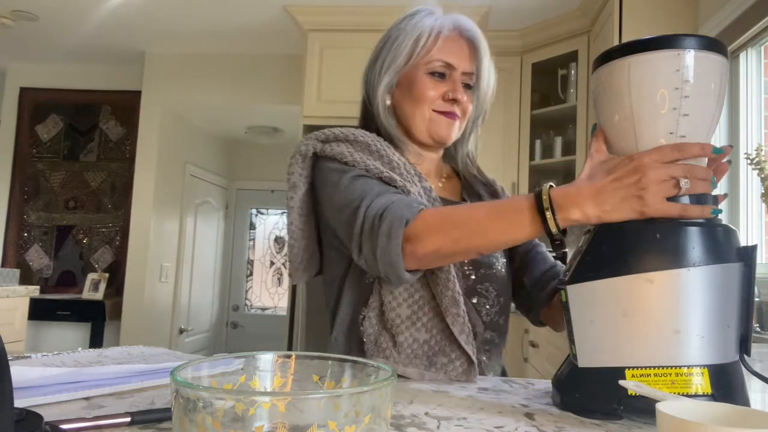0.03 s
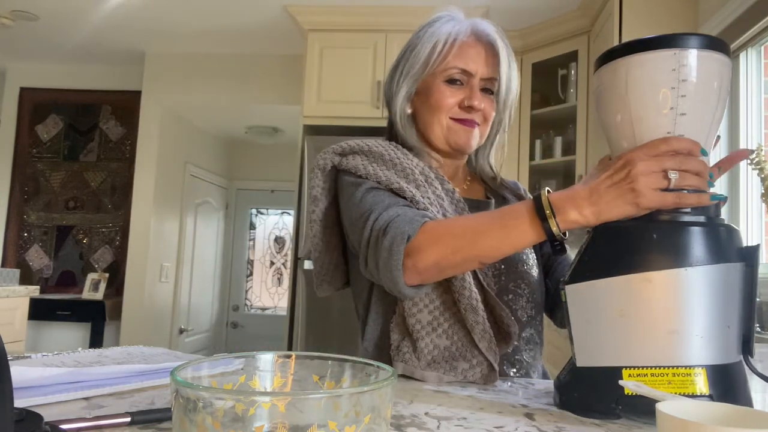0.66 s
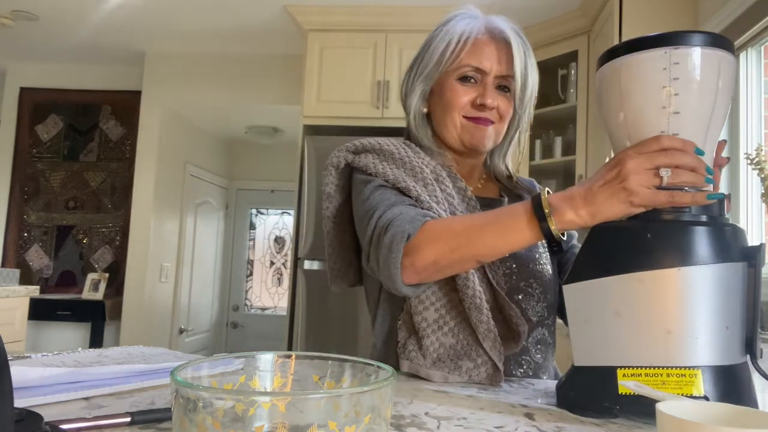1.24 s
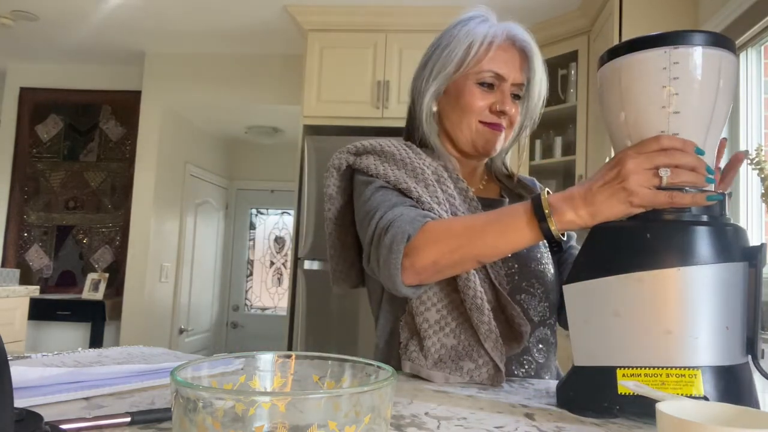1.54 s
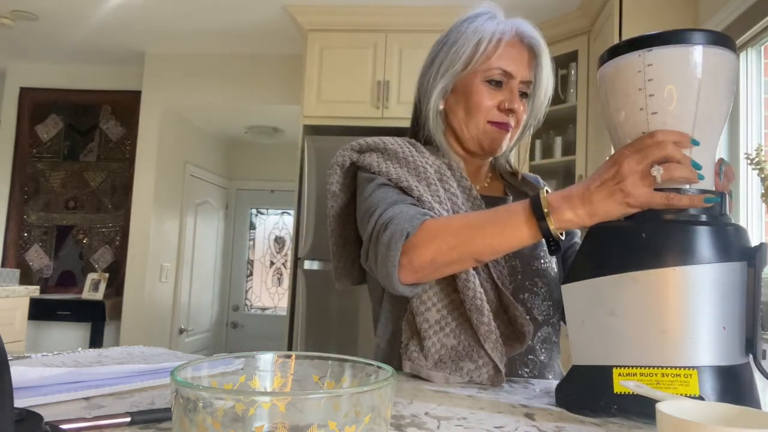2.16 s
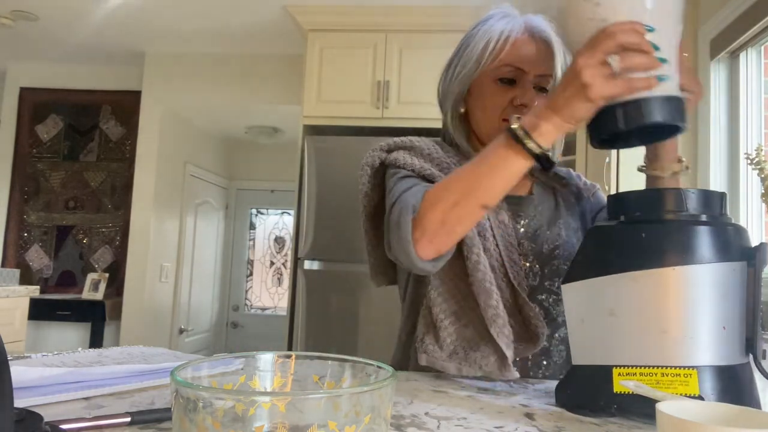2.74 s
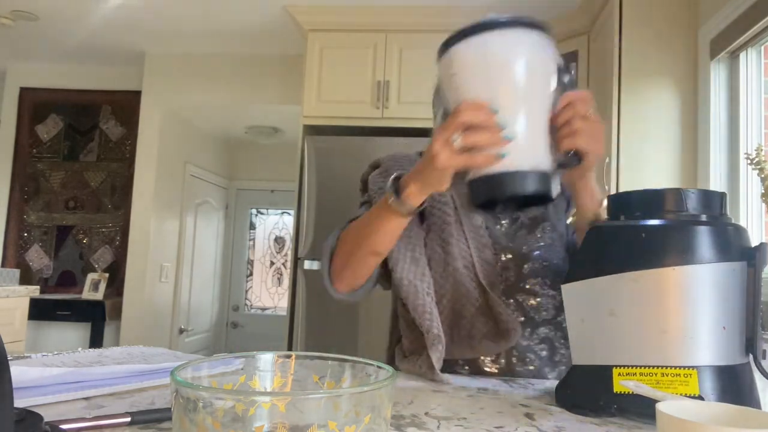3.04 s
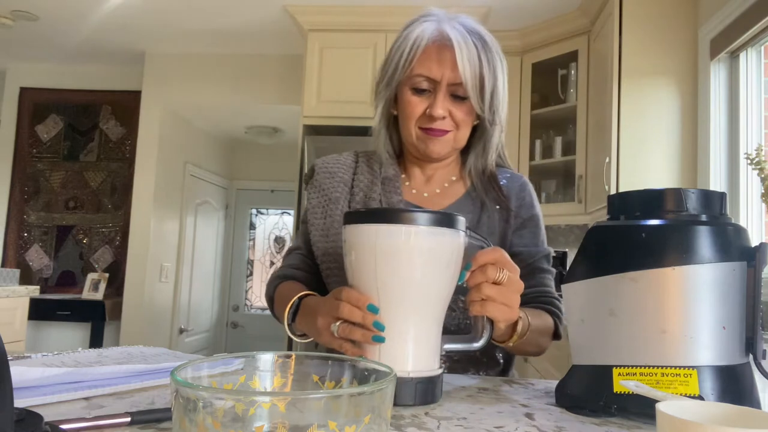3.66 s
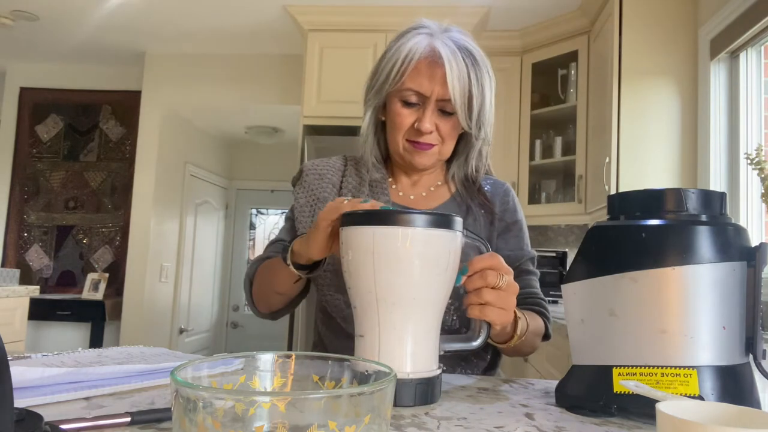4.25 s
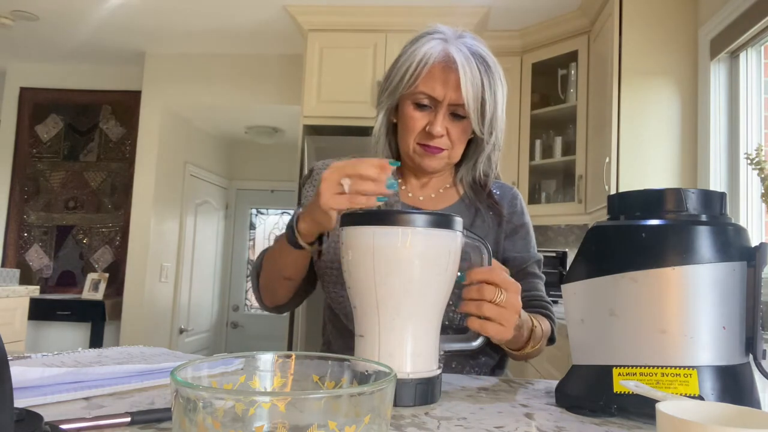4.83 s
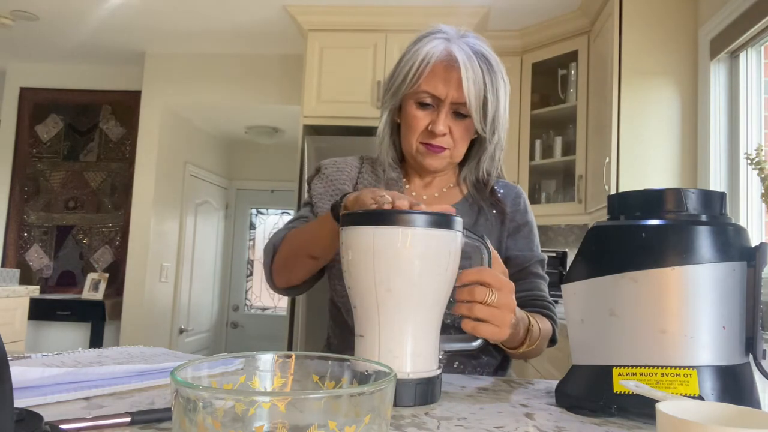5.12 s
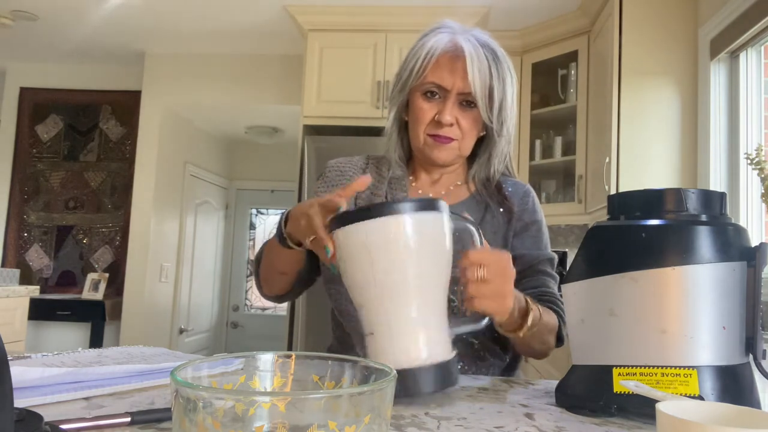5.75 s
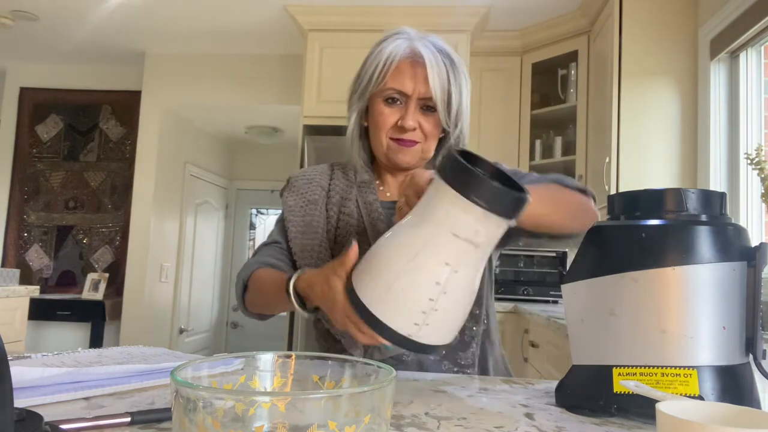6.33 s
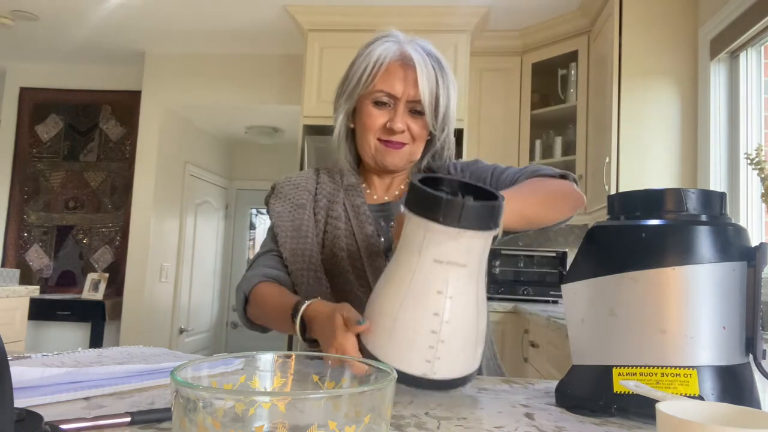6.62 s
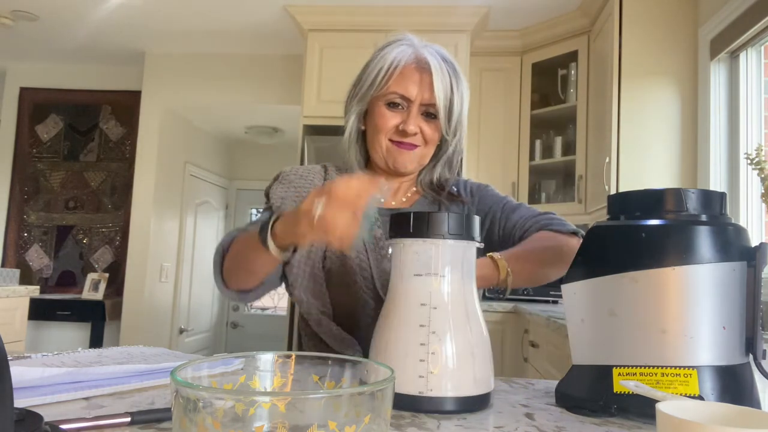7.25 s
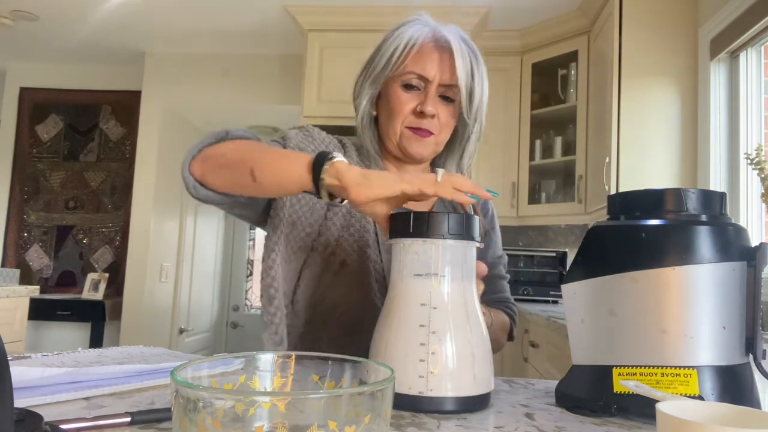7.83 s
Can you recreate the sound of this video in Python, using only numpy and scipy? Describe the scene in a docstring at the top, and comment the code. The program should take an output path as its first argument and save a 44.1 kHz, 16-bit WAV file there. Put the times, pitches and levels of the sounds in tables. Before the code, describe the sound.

Close up in a slightly echoing kitchen, a blender's last brief rattle dies away on the right. Its plastic pitcher ticks and scrapes in the base, then comes loose with a clunk. A little to the left it knocks down on the counter, and hands quietly tap and slide over it. Two louder, booming knocks follow as it lands again, ending with light fingernail clicks over a low room hum.

```python
"""A hard-walled kitchen, two microphones side by side, close to a blender on a stone counter.
On the right the motor rattles to a stop and the full plastic pitcher is twisted free with a clunk.
A little to the left it is set down, turned over and set down again, booming in the cabinet below.
Hands tap and rub on the plastic; the room rings after every knock, over a low steady hum."""
import sys
import numpy as np
from scipy import signal
from scipy.fft import rfft, irfft, next_fast_len
from scipy.io import wavfile

SR = 44100
rng = np.random.default_rng(int(sys.argv[2]) if len(sys.argv) > 2 else 0)


def store_pcm(level_fs):
    """Save levels as 16-bit WAV."""
    pcm = np.round(np.clip(level_fs, -1, 1) * 32767).astype(np.int16)
    wavfile.write(sys.argv[1], SR, np.atleast_2d(pcm).T)


N = 347640

# The pitcher knocking free of the base. Each row: start in seconds, ring in dB, contact cut-off in Hz,
# crack in dB, crack t60 in seconds, left minus right in dB.
UNSEAT_KNOCKS = [(2.0738, -28.5, 1790, -24, .04, 3.5), (2.0795, -35, 1490, -29.5, 0.046, -6.5),
                 (2.0838, -12.5, 520, -27, 0.11, 0), (2.0915, -23.5, 500, -50, 0.088, 3.5),
                 (2.325, -50.5, 500, -58.5, 0.076, 7), (2.418, -40.5, 450, -56, 0.091, 4),
                 (2.429, -35, 700, -56, 0.26, -3), (2.452, -41, 1470, -48.5, 0.17, 4)]
# The loose coupling ticking in its seat. Each row reads as for the knocks above.
SEAT_TICKS = [(.4875, -54, 2960, -56.5, 0.086, 0), (.769, -51.5, 1996, -61, 0.087, 0.0024),
              (.815, -62, 1100, -74, 0.025, 0.0039), (1.8575, -48, 2500, -50.5, 0.038, 0),
              (1.953, -51.5, 1300, -66.5, 0.04, 0.0015)]
# The pitcher on the counter. Each row: the same six, then cabinet boom in dB, cabinet drum in dB.
COUNTER_KNOCKS = [(3.6204, -17.5, 440, -39, 0.027, 2.5, -40.5, -51),
                  (3.672, -23, 447, -43.5, 0.02, 1, -42.5, -39.5),
                  (6.7012, -18.5, 650, -26, 0.02, 0.5, -21.5, -25),
                  (6.7092, -9.5, 200, -42.5, 0.06, 3, -33, -32),
                  (6.7771, -19, 684, -38.5, 0.024, -0.5, -30.5, -25.5),
                  (6.8106, -23.5, 677, -36, 0.013, 2.5, -37.5, -29),
                  (7.1909, -11, 950, -27.5, 0.037, 1.5, -32.5, -34)]
# How base, seat and pitcher ring. Each row: frequency in Hz, level in dB, t60 in seconds.
BASE_MODES = [(55, -23.5, .6), (252, 1, 0.069), (322, -1, 0.086), (379, -3, 0.08), (430, -11, 0.18),
              (715, -7, .045), (780, -17.5, 0.043), (1052, 0, 0.0607), (1169.5, -12, .04),
              (1500, -6, 0.035), (1655, -7, 0.15), (2150, -17, .03), (2700, -13, 0.046), (3560, -18.5, .03)]
SEAT_MODES = [(696, -1, 0.065), (1050, -0.5, 0.035), (2820, -10, .02)]
PITCHER_MODES = [(100, -15, 0.051), (166, -11, 0.055), (238.2, -14, 0.082), (294, -7, 0.048),
                 (415.4, -4, 0.044), (474, -4.5, 0.066), (633, -8.5, 0.072), (715, -4.5, 0.017),
                 (810.4, -7.5, 0.041), (1020, -9, 0.029), (1170, -11.5, 0.027), (1390, -2, 0.017),
                 (1920, -8, 0.021), (2250, -19.5, .025), (2910, -34.5, .02)]
# The motor housing's resonances. Each row: centre in Hz, width in Hz, level in dB.
HOUSING_MODES = [(264, 38, 0.5), (327, 94, -3), (738, 220, -10), (1013, 65, 2), (1400, 22, -10.5),
                 (2290, 330, -19.5)]
# The collar twisting and dragging out of its seat, and hands sliding on plastic.
# Each row: middle in seconds, length in seconds, scuff in dB, hiss in dB.
COLLAR_STROKES = [(.64, .24, -83.5, -115), (1.21, .45, -86, -115), (1.655, .19, -65.5, -103),
                  (1.76, .2, -67, -102), (1.99, .16, -84, -110), (2.085, .07, -42, -66),
                  (2.14, .18, -53.5, -70), (2.34, 0.24, -66.5, -73), (2.45, 0.098, -54.5, -66),
                  (2.5, .09, -57, -69.5)]
HAND_STROKES = [(2.96, 0.15, -75, -104), (3.15, .15, -83.5, -74.5), (3.3, 0.21, -92, -90),
                (3.948, 0.039, -95, -80), (4.07, .11, -85, -78), (4.285, 0.083, -95, -80),
                (4.715, 0.094, -79, -78.5), (4.93, .2, -89, -104), (5.02, 0.096, -85.5, -81.5),
                (5.215, 0.14, -81, -75.5), (5.31, 0.16, -77.5, -70.5), (5.66, 0.2, -81.5, -79.5),
                (5.745, .13, -66.5, -80.5), (6.025, 0.13, -89, -80.5), (6.07, .16, -86, -100),
                (6.255, 0.13, -76, -79.5), (6.35, 0.14, -78, -80), (6.48, 0.22, -89.5, -80),
                (6.595, 0.087, -81.5, -77)]
# Palm and fingers on lid and wall. Each row: start in seconds, level in dB, centre in Hz, t60 in seconds.
PATS = [(4.106, -49, 1900, .04), (4.108, -49.5, 586, 0.053), (4.676, -43.5, 548, 0.041),
        (4.96, -61, 330, 0.24), (5.7, -57, 300, 0.44), (5.754, -48.5, 63.6, 0.22), (6.29, -53.5, 258, 0.21),
        (6.3429, -49.5, 1060, 0.029), (6.358, -47, 497, 0.029), (6.525, -60.5, 403, 0.14),
        (7.681, -49.5, 910, 0.025), (7.814, -54.5, 900, 0.027)]
# Nails and a ring on the plastic. Each row: start in seconds, level in dB, centre in Hz.
NAIL_TICKS = [(1.81, -58.5, 7250), (1.859, -54, 6555), (2.274, -60, 8950), (2.292, -66, 7950),
              (3.924, -53, 5400), (4.898, -65, 6950), (5.37, -62, 8900), (5.679, -58.5, 7500),
              (6.164, -67.5, 9140), (6.24, -67.5, 5000), (6.3447, -61, 4480), (7.597, -63, 4090),
              (7.6812, -47.5, 4670), (7.813, -54.5, 3500), (7.859, -56, 3330)]
# Fingertips rasping. Each row: start in seconds, length in seconds, pitch in Hz, level in dB.
SQUEAKS = [(3.108, 0.099, 2600, -75), (3.258, .08, 2720, -85), (3.352, .1, 3080, -89.5),
           (3.452, .077, 2820, -87), (4.848, 0.12, 2580, -82), (5.17, 0.13, 2070, -78.5),
           (5.26, 0.052, 5230, -78), (5.622, 0.17, 1700, -79), (5.71, 0.044, 2360, -71.5),
           (5.975, .15, 3870, -88.5), (7.714, .15, 2590, -81.5)]
# The kitchen's reverberation. Each row: band centre in Hz, t60 in seconds, level in dB.
ROOM_BANDS = [(59, 1, -2), (160.6, .62, -1.5), (400, 0.41, -4.5), (1100, .5, -4.5), (2880, 0.5, -1),
              (7600, 0.48, -5), (14200, 0.38, -9)]
# Tone curves of the noises. Each row: frequency in Hz, relative level in dB.
CRACK_COLOUR = [(150, -6), (700, 6), (1400, -5.5), (2200, -6), (3600, -13), (5500, -20.5), (8000, -24),
                (12500, -28), (16000, -28.5)]
RATTLE_COLOUR = [(100, -24.5), (500, -1), (1200, 21), (2500, 7.5), (4000, 1), (5500, -1), (7500, -13),
                 (13000, -26)]
COLLAR_COLOUR = [(200, -6), (450, -1.5), (750, 3), (1050, 3), (1600, -6.5), (2600, -9), (4000, -17),
                 (8000, -35)]
HAND_COLOUR = [(300, -7), (800, -5), (1300, 2.5), (1900, 1), (2600, -0.5), (4000, -7.5), (8000, -27.5)]
HISS_COLOUR = [(2000, -20.5), (4500, -2), (7000, -0.5), (10000, -3), (12500, 4), (15000, -13)]
HUM_COLOUR = [(25, -23.5), (38, -10), (54, 8.5), (78, -7.5), (105, -0.5), (145, -0.5), (205, -9.5),
              (260, -6), (400, -8.5), (600, -18), (900, -34), (2600, -43.5), (7500, -49.5), (15000, -48.5)]

BOOM, DRUM = (54, 0.72, .012), (154, 0.4, 0.008)  # cabinet modes: pitch in Hz, t60 and rise in seconds
STOP_S, TEETH_PER_S, RATTLE_DB, RATTLE_POWER = .26, 160, -36.5, 1.13
MOTOR_HZ, MOTOR_SAG_HZ_PER_S, MOTOR_DB, MOTOR_HOLD_S, MOTOR_T60_S = 251, 420, -37, 0.022, .06
SNAGS_PER_S, SNAG_DB, SNAG_S, STROKE_POWER = 35, 7, .0015, 1.5
SQUEAK_WIDTH_HZ = 240
BASE_SEND_DB, COUNTER_SEND_DB, HANDS_SEND_DB = -0.9, 1, 0.07  # into the room
HUM_DB = -64.5


def knocks(rows, modes, click_share, detune, press_s):
    """Blows ring an object's modes, a soft contact mainly the low ones; the shell adds a short crack."""
    out, t = np.zeros((2, N)), clock(.3)
    for start, ring_db, contact_hz, crack_db, crack_t60, pan_db, *_ in rows:
        ring = 0
        for k, (hz, db, t60) in enumerate(modes):
            pitch = hz * (1 + detune * rng.standard_normal())  # each blow lands on a different spot
            # high modes reach the two microphones out of step
            skew = np.minimum(hz / 700, 1.3) * rng.standard_normal() * np.array([[.5], [-.5]])
            # neighbouring modes start in opposite directions
            gain = (-1) ** k * undb(db) / np.hypot(1, (hz / contact_hz) ** 2)
            ring = ring + gain * fade(t, t60) * np.sin(2 * np.pi * pitch * t + skew)
        ring = ring * (1 - np.exp(-t / press_s))
        crack = unit(colour(air(len(t), alike_hz=1418), CRACK_COLOUR))
        crack *= (fade(t, crack_t60) + click_share * fade(t, 0.0031)) * (1 - np.exp(-t / 0.00013))
        add(out, start, (undb(ring_db) * ring + undb(crack_db) * crack) * pan(pan_db))
    return out


def cabinet_boom():
    """Knocks on the counter swell two low cabinet modes; each new blow takes over from the last."""
    out, t = np.zeros((2, N)), clock(1)
    now = np.arange(N) / SR
    for start, *_, pan_db, boom_db, drum_db in COUNTER_KNOCKS:
        swell = 0
        for (hz, t60, rise), db in ((BOOM, boom_db), (DRUM, drum_db)):
            # crowded, better damped panel modes beat against the main one
            panels = resonate(air(len(t), alike_hz=250), hz, hz / 2)
            panels = unit(resonate(panels, hz, hz / 2)) * fade(t, 0.49)
            envelope = undb(db) * fade(t, t60) * (1 - np.exp(-t / rise))
            swell = swell + envelope * (np.sin(2 * np.pi * hz * t) + panels)
        out *= np.exp(-np.maximum(now - start, 0) / 0.011)
        add(out, start, pan(pan_db) * swell)
    return out


def motor_run_down():
    """The motor's hum sinks away; coupling teeth chatter ever slower and softer through the housing."""
    out, t = np.zeros((2, N)), clock(0.37)
    speed = np.clip(1 - t / STOP_S, 0, 1)
    teeth_passed = np.cumsum(TEETH_PER_S * speed) / SR
    force = undb(0.65 * rng.standard_normal(size=100))[teeth_passed.astype(int)]
    chatter = air(len(t), alike_hz=900) * (0.97 + force * np.exp(-(teeth_passed % 1) / 0.087))
    housing = sum(undb(db) * resonate(chatter, hz, width) for hz, width, db in HOUSING_MODES)
    housing = unit(butterworth(housing, 3000, "low", order=2))
    clatter = undb(-8) * unit(colour(chatter, RATTLE_COLOUR))
    rattle = (housing + clatter) * undb(RATTLE_DB) * speed ** RATTLE_POWER
    hum = np.sin(2 * np.pi * np.cumsum(MOTOR_HZ - MOTOR_SAG_HZ_PER_S * t) / SR)
    hum *= undb(MOTOR_DB) * fade(np.maximum(t - MOTOR_HOLD_S, 0), MOTOR_T60_S)
    add(out, 0, rattle + hum)
    return out


def rubbing(strokes, scuff_colour):
    """A surface sticks and slips on plastic: a grainy scuff and a fine hiss swell with its speed."""
    out = np.zeros((2, N))
    for middle, length, scuff_db, hiss_db in strokes:
        t = clock(length)
        speed = np.sin(np.pi * t / length)
        grip = undb(2.5 * rng.standard_normal(len(t) // 64 + 1))[np.arange(len(t)) // 64]
        snags = rng.random(len(t)) < SNAGS_PER_S / SR
        crackle = signal.lfilter([1], [1, -np.exp(-1 / (SNAG_S * SR))], snags)
        grains = air(len(t)) * (grip + undb(SNAG_DB) * crackle)
        scuff = unit(colour(grains, scuff_colour)) * undb(scuff_db)
        hiss = unit(colour(grains, HISS_COLOUR)) * undb(hiss_db)
        add(out, middle - length / 2, (scuff + hiss) * speed ** STROKE_POWER)
    return out


def taps():
    """Dull pats of the palm and sharp ticks of nails and ring."""
    out = np.zeros((2, N))
    for start, db, hz, t60 in PATS:
        add(out, start, undb(db) * touch(hz, width_hz=0.69 * hz, t60=t60))
    for start, db, hz in NAIL_TICKS:
        add(out, start, undb(db) * touch(hz, width_hz=.85 * hz, t60=.01))
    return out


def touch(hz, width_hz, t60):
    """One touch on the plastic: a brief burst in one broad resonance."""
    t = clock(.25)
    burst = resonate(air(len(t), alike_hz=1339), hz, width_hz)
    burst = resonate(burst, hz, 2 * width_hz) + .05 * burst
    # soft flesh takes about a cycle to press home and leaves out what lies far above
    burst = butterworth(burst, min(hz + 2 * width_hz, SR * .45), "low", order=4)
    return unit(burst) * fade(t, t60) * (1 - np.exp(-2 * t * hz))


def squeaks():
    """Stick-slip of a fingertip gathers round one thin, rough pitch."""
    out = np.zeros((2, N))
    for start, length, hz, db in SQUEAKS:
        t = clock(length)
        rasp = resonate(air(len(t)), hz, SQUEAK_WIDTH_HZ)
        rasp = unit(resonate(rasp, hz, 2 * SQUEAK_WIDTH_HZ))
        add(out, start, undb(db) * np.sin(np.pi * t / length) * rasp)
    return out


def kitchen_reverb(x):
    """Dense reflections from nearby cupboards and walls, each band dying at its own rate."""
    t = clock(.9)
    hz, t60s, db = np.transpose(ROOM_BANDS)
    spectrum = rfft(air(len(t), alike_hz=260))
    log_f = np.log(np.maximum(np.fft.rfftfreq(len(t), 1 / SR), 1))
    onset = np.clip((t - .003) / 0.0027, 0, 1)
    tail = 0
    for band, t60, gain in zip(np.eye(len(hz)), t60s, undb(db)):
        reflections = irfft(spectrum * np.interp(log_f, np.log(hz), band), len(t))
        envelope = fade(t, t60) * onset
        tail = tail + gain * reflections * envelope / np.linalg.norm(envelope)
    return signal.fftconvolve(x, tail, axes=1)[:, :N]


def room_hum():
    """Room tone: a low steady hum of noise behind everything."""
    return undb(HUM_DB) * unit(colour(air(N, alike_hz=500), HUM_COLOUR))


def air(size, alike_hz=600):
    """Noise at two close microphones: alike in the bass, unrelated in the treble."""
    mid, side = rng.standard_normal((2, size))
    side = butterworth(side, alike_hz, "high", order=1)
    return np.array([mid + side, mid - side]) / np.sqrt(2)


def far_mic_delay(x, channel, samples):
    """Sound from one side reaches the far microphone late; channel 0 is the left."""
    out = x.copy()
    out[channel] = np.pad(x[channel], (samples, 0))[:N]
    return out


def pan(left_minus_right_db):
    """Gains at the left and right microphones."""
    return undb(np.array([[.5], [-.5]]) * left_minus_right_db)


def colour(x, points):
    """Filter by a smooth (Hz, dB) curve."""
    hz, db = np.transpose(points)
    size = next_fast_len(x.shape[-1])
    f = np.maximum(np.fft.rfftfreq(size, 1 / SR), 1)
    gain = undb(np.interp(np.log(f), np.log(hz), db))
    return irfft(rfft(x, size) * gain, size)[..., :x.shape[-1]]


def resonate(x, hz, width_hz):
    """Two-pole resonance, gain 1 at its centre."""
    return signal.lfilter(*signal.iirpeak(min(hz, SR * .45), hz / min(width_hz, SR / 4), fs=SR), x)


def butterworth(x, hz, kind, order):
    """Low-pass or high-pass filter."""
    return signal.sosfilt(signal.butter(order, hz, kind, fs=SR, output="sos"), x)


def undb(db):
    """Decibels to amplitude."""
    return 10 ** (np.asarray(db) / 20)


def clock(length):
    """Sample times over a length in seconds."""
    return np.arange(int(length * SR)) / SR


def unit(x):
    """Scale to an RMS of 1."""
    return x / np.sqrt(np.mean(x ** 2))


def fade(t, t60):
    """Decay by 60 dB in t60 seconds."""
    return np.exp(-np.log(1000) * t / t60)


def add(out, start, sound):
    """Mix a sound in at a time in seconds."""
    i = max(int(start * SR), 0)
    out[:, i:i + sound.shape[-1]] += sound[..., :N - i]


def scene():
    """From the microphones: the base to the right, pitcher and hands a little left, the room around."""
    base = knocks(UNSEAT_KNOCKS, BASE_MODES, click_share=.3, detune=0.013, press_s=0.00024)
    base += motor_run_down()
    base += knocks(SEAT_TICKS, SEAT_MODES, click_share=1.0, detune=0.0044, press_s=.002)
    base += rubbing(COLLAR_STROKES, COLLAR_COLOUR)
    counter = knocks(COUNTER_KNOCKS, PITCHER_MODES, click_share=0.57, detune=0.02, press_s=0.00067)
    hands = taps() + squeaks() + rubbing(HAND_STROKES, HAND_COLOUR)
    direct = far_mic_delay(base, channel=0, samples=5)
    direct += far_mic_delay(counter + hands, channel=1, samples=2)
    send = undb(BASE_SEND_DB) * base + undb(COUNTER_SEND_DB) * counter + undb(HANDS_SEND_DB) * hands
    room = kitchen_reverb(send) + room_hum()
    return direct + cabinet_boom() + room


def record(dry):
    """The deepest bass is rolled off, a narrow band near 9 kHz is missing, and the top is cut."""
    heard = dry - resonate(dry, 9100, width_hz=1700)
    heard = butterworth(heard, 40, "high", order=5)
    heard = butterworth(heard, 13800, "low", order=8)
    return signal.sosfilt(signal.ellip(8, .2, 70, 15700, fs=SR, output="sos"), heard)


dry = scene()
out = record(dry)
store_pcm(out)
```